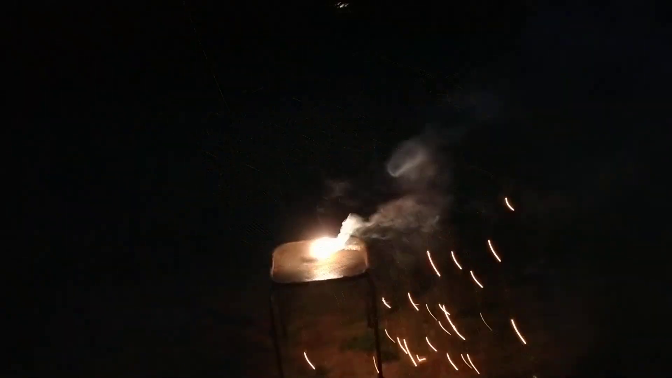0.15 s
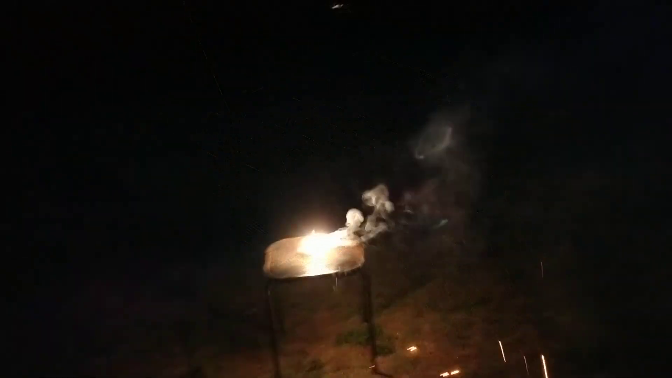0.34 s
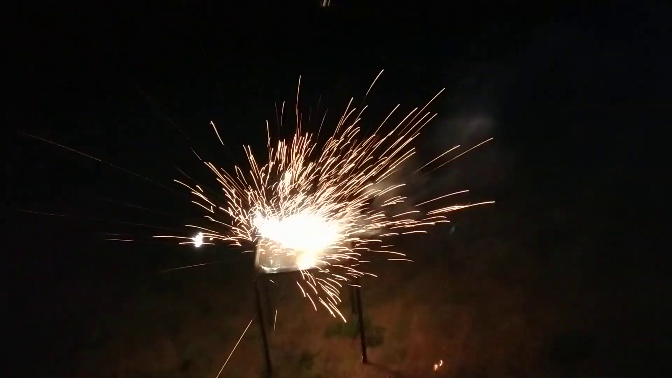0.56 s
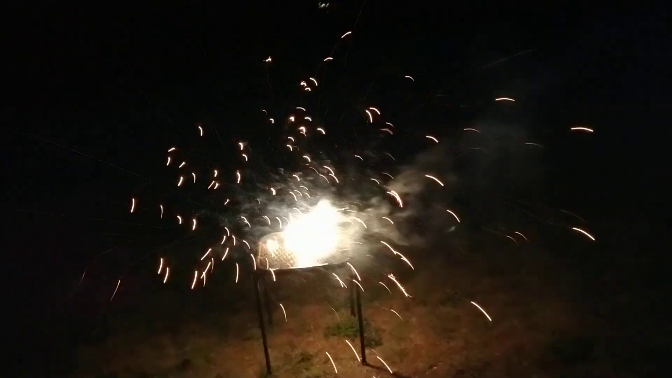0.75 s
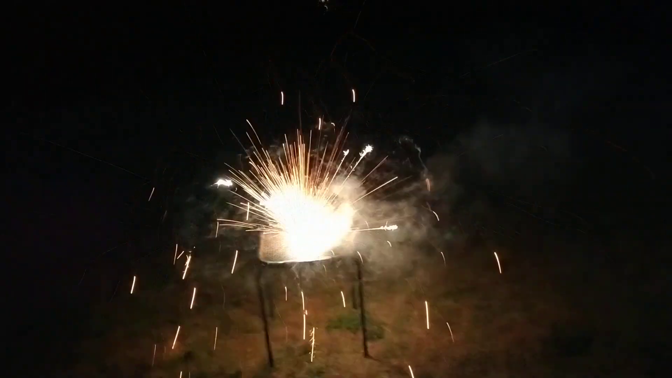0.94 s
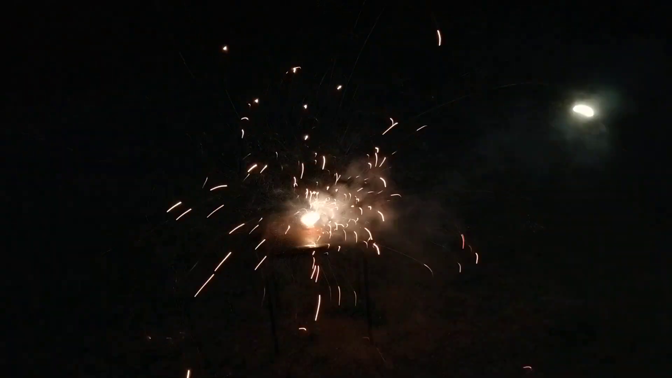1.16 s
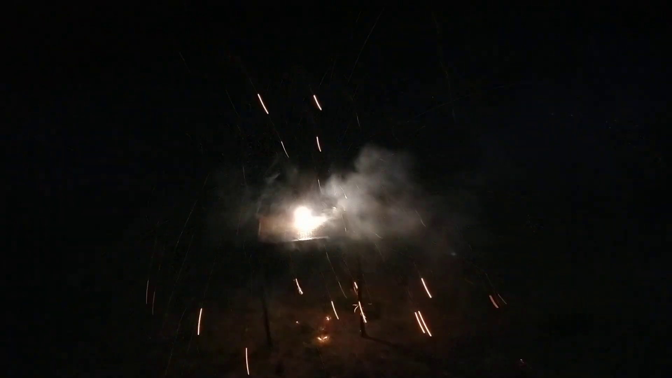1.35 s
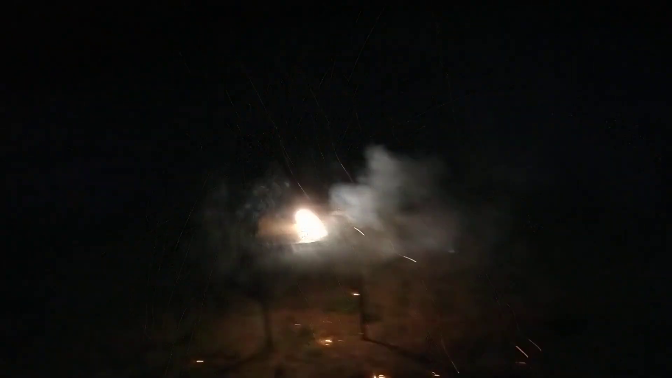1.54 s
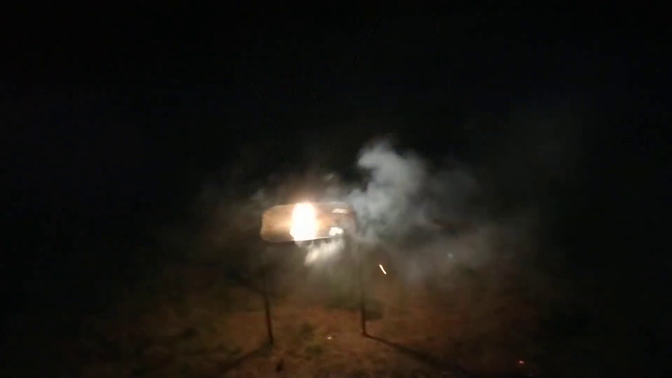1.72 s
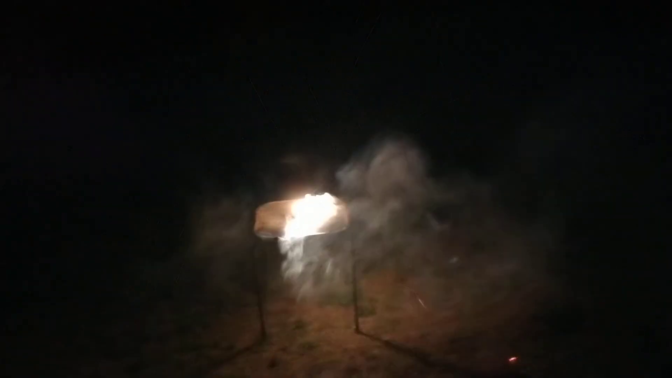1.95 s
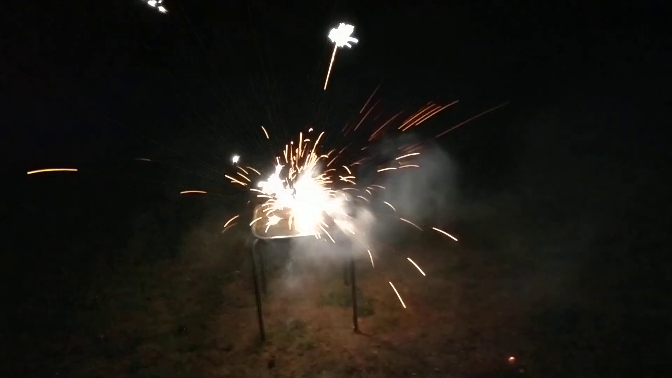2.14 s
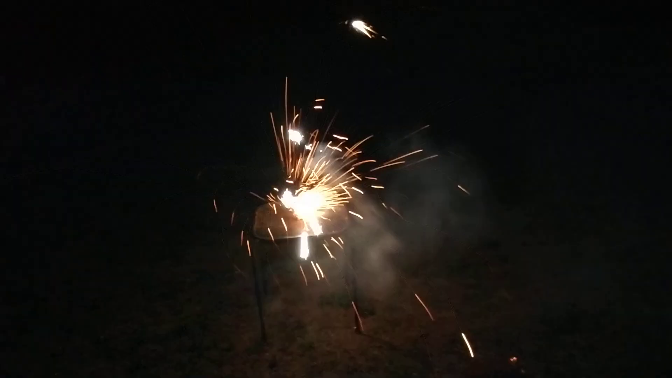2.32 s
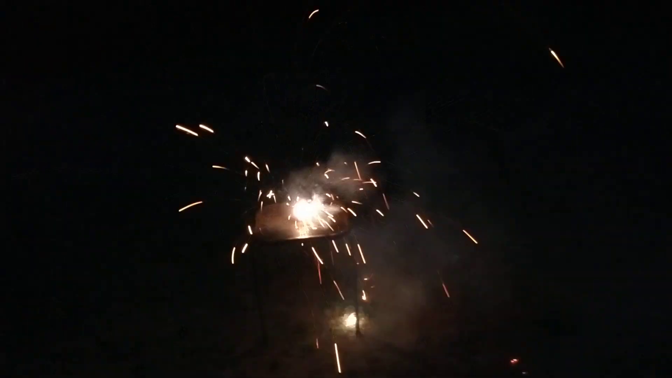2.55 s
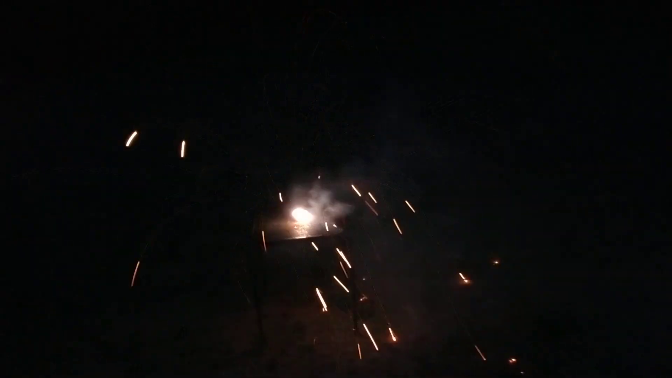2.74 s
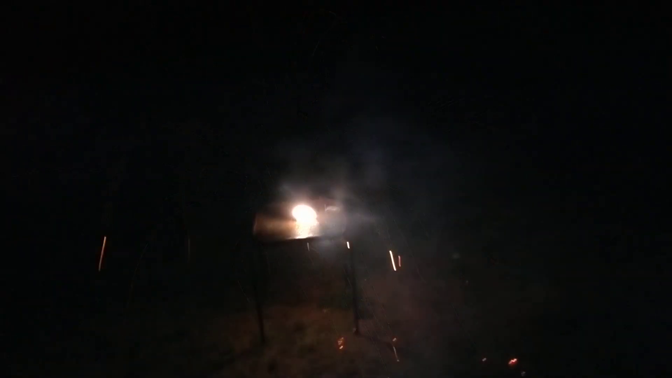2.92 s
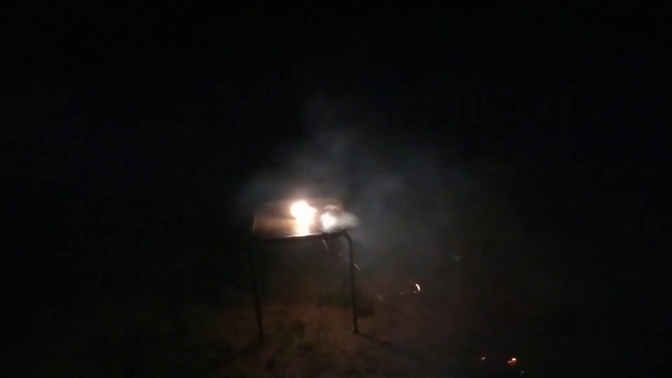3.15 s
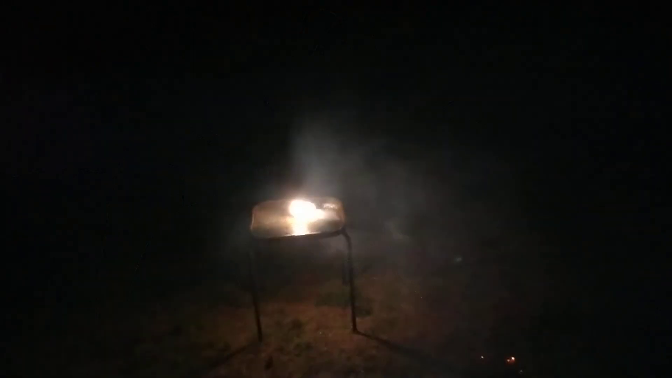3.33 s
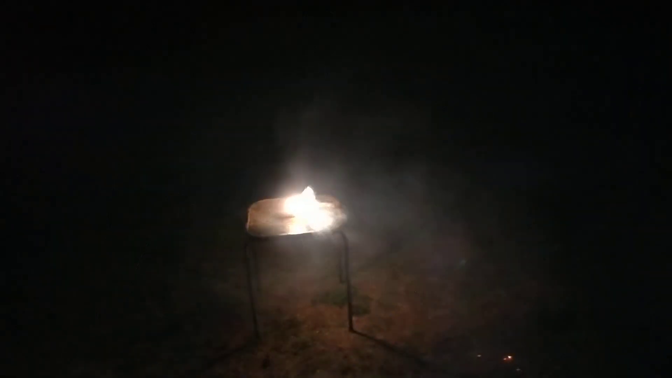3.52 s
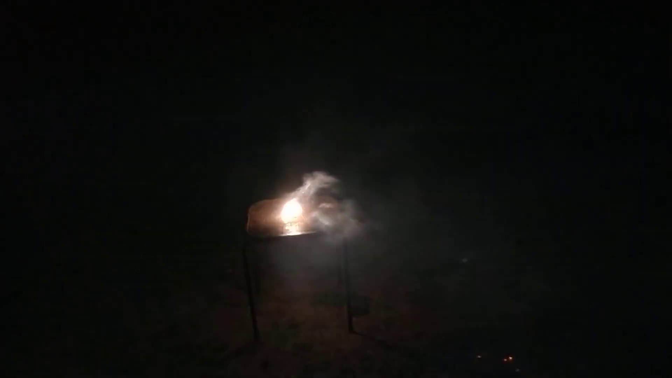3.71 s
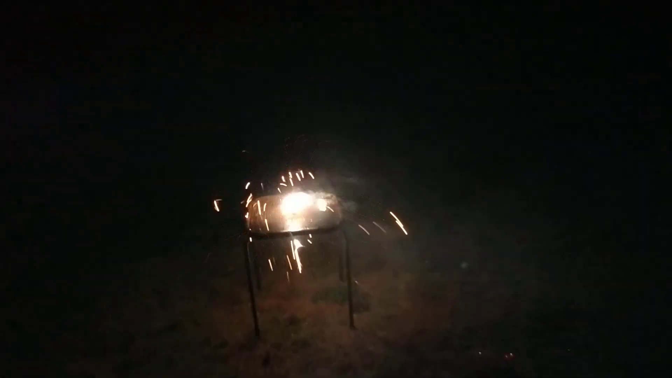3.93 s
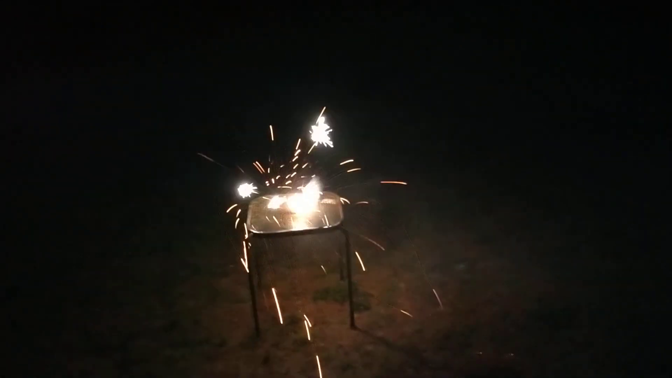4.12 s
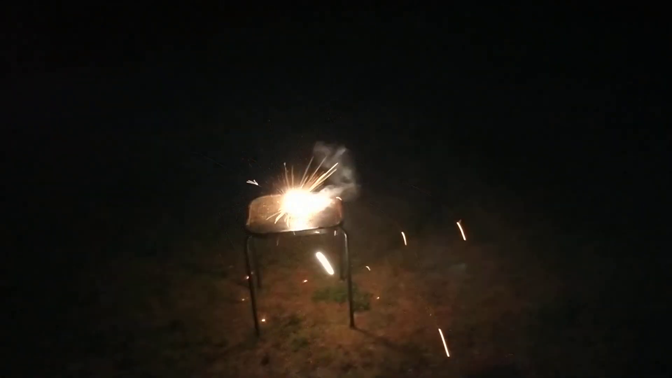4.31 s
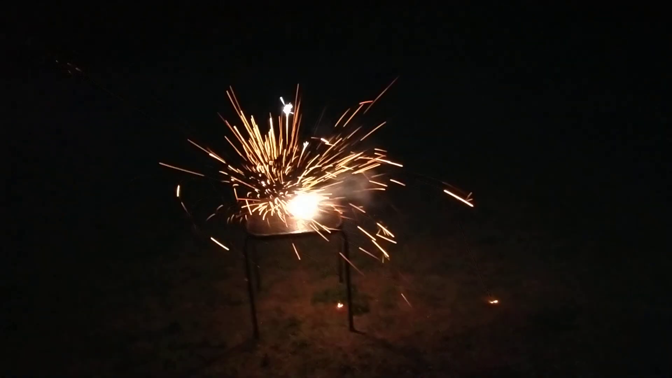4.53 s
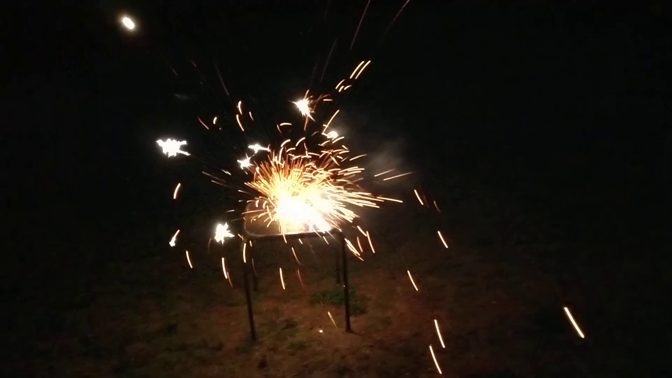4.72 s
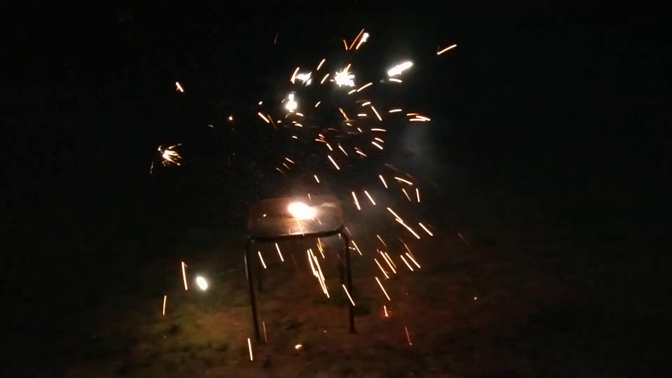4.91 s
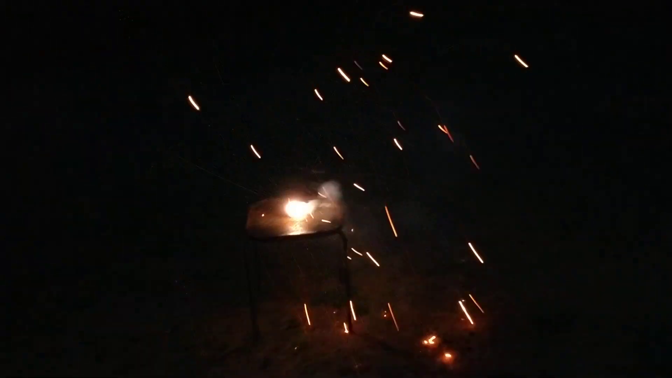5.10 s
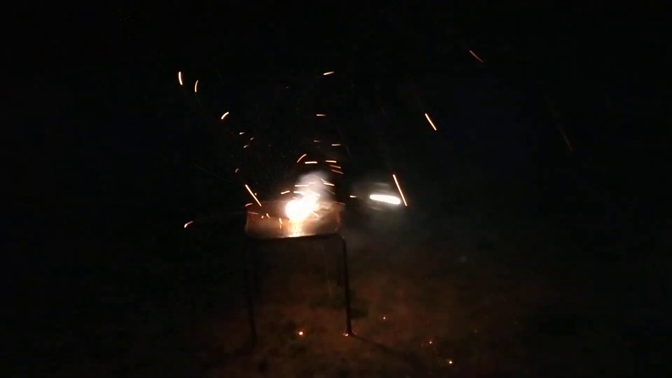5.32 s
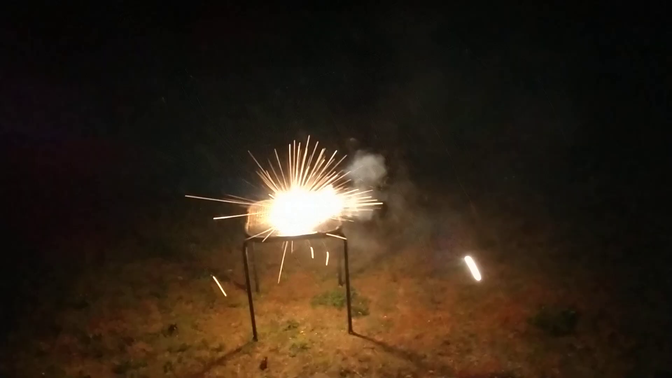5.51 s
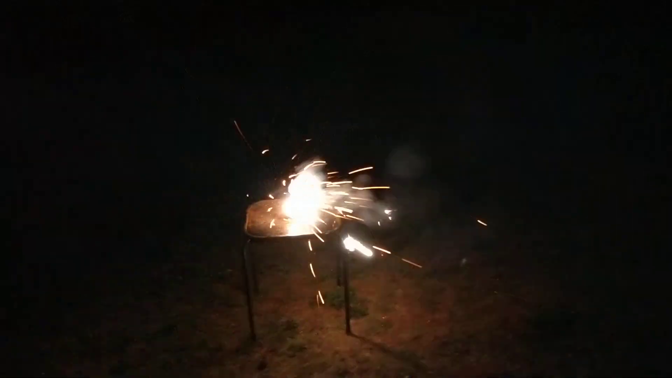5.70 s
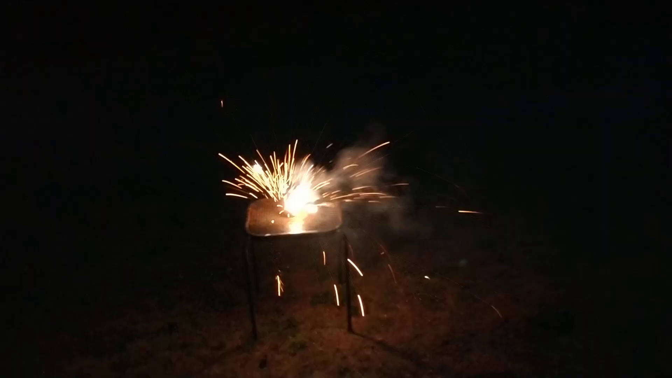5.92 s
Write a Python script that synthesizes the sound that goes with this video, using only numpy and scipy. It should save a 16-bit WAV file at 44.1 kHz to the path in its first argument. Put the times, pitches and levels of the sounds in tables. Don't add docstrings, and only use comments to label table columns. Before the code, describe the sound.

Night yard, stereo camera a few metres from a small firework on a table. It opens on the fading roll of an earlier bang, with bright fuse fizz, faint low traffic and a thin high insect trill. Around 0.4-0.55 s the fuse sputters in soft rapid puffs. A hard crack lands at 0.6, then a tight cluster at 1.0-1.2. Sizzle and small spits fill the gap until a double crack at 2.2, a very loud pair at 2.4 and another at 2.6. From 2.7 to 3.8 only fizz, flame rush, ticks and pattering cinders remain as echoes die. Cracks resume at 3.85-4.15, then crowd at 4.45-4.85, with more at 5.05, 5.3 and a close pair near 5.7. Each is an instant, clipped snap with a dull tabletop knock, quick slaps off ground and walls, and a diffuse roll; the last roll is still ringing at the end.

```python
import sys
import numpy as np
from scipy import signal
from scipy.fft import rfft, irfft, next_fast_len
from scipy.io import wavfile
from scipy.ndimage import uniform_filter1d, map_coordinates

SR = 44100
rng = np.random.default_rng(int(sys.argv[2]) if len(sys.argv) > 2 else 0)


def waveform_to_disk(signal):
    frames = np.transpose(np.atleast_2d(signal))
    scaled = np.clip(frames, -1, 1) * 32767
    samples = np.round(scaled).astype(np.int16)
    wavfile.write(sys.argv[1], SR, samples)


def invert_db(level):
    return 10 ** (np.asarray(level, dtype=float) / 20)


N = 262836


def unit(x):
    return x / np.sqrt(np.mean(x ** 2) + 1e-20)


def along(points, hz):
    f, v = np.transpose(points)
    return np.interp(np.log(hz + 1), np.log(f + 1), v)


def hump(centre_hz, steep_db):
    return lambda hz: -steep_db * np.log2((hz + 1) / centre_hz) ** 2


def filtered(x, response):
    m = next_fast_len(x.shape[-1] + 4096)
    return irfft(rfft(x, m) * response(np.fft.rfftfreq(m, 1 / SR)), m)[..., :x.shape[-1]]


# f/Hz, correlation/1
LIKENESS = [(60, 0.83), (180, 1), (550, 0.56), (1650, -0.046), (4970, -0.05), (15000, 0.11)]


def noise(size, colour_db):
    def response(hz):
        turn = np.arccos(np.clip(along(LIKENESS, hz), -1, 1)) / 2
        return invert_db(colour_db(hz)) * [np.cos(turn), np.sin(turn)]
    mid, side = filtered(rng.standard_normal((2, size)), response)
    return unit(np.array([mid + side, mid - side]))


def wobble(rate, size):
    knots = rng.standard_normal((2, int(size * rate / SR) + 4))
    return np.array([map_coordinates(k, [np.arange(size) * rate / SR], order=1) for k in knots])


def dying(t, t60, rise):
    t = np.maximum(t, 0)
    return (1 - np.exp(-t / rise)) * invert_db(-60 * t / t60)


def arrivals(table, t, scatter_db, rise):
    power = 0
    for s, left, right, t60 in table:
        level_db = np.c_[[left, right]] + scatter_db * rng.standard_normal((2, 1))
        power = power + (invert_db(level_db) * dying(t - s, t60, rise)) ** 2
    return np.sqrt(power)


def add(track, s, x):
    at = round(s * SR)
    track[:, max(at, 0):at + x.shape[1]] += x[:, max(-at, 0):]


# f/Hz, density/dB
TRAFFIC_COLOUR = [(25, -41), (45, -29.5), (64, -10), (86, -2), (130, -6.5), (180, -12), (230, -37),
                  (330, -54)]


def traffic():
    return invert_db(-64.5 + 1.6 * wobble(5.5, N)[0]) * noise(N, lambda hz: along(TRAFFIC_COLOUR, hz))


# t/s, f/Hz, level/dB
TRILL = [
    (0, 7680, -68),
    (0.599, 7580, -63.5),
    (1.502, 7840, -68),
    (2.15, 7800, -66.5),
    (2.9, 7850, -67),
    (3.3, 7790, -70),
    (3.83, 7690, -70.5),
    (6, 7740, -79),
]


def insect():
    s, trill_hz, db = np.transpose(TRILL)
    t = np.arange(N) / SR
    pitch_hz = np.interp(t, s, trill_hz) + 25 * wobble(30.0, N)[0]
    phase = 2 * np.pi * np.cumsum(pitch_hz) / SR
    return invert_db(np.interp(t, s, db) + 3.5 + 2.6 * wobble(50, N)) * np.cos(phase + 1.6 * wobble(160, N))


# t/s, sparks/dB, flame/dB
FUSE = [(0, 8.5, 2.5), (.27, 4, 4.5), (.31, 10.5, 5.5), (.43, 14.5, 10), (.6, 10, 5.5), (1.6, 0, 1.5),
        (1.71, 2, 5), (1.91, -11.5, -1), (2.15, -1, 0.5), (3.0, -12, -5), (3.1, -0.5, 1), (3.29, -7, -3),
        (3.51, -10, -3), (3.64, 5, -1.5), (3.74, -5, -2.5), (3.83, 2, -0.5), (4.3, 9, 3), (4.43, 6, -1.5)]
# f/Hz, density/dB
FIZZ_COLOUR = [(4000, -48), (7000, -8.5), (9000, -7), (10500, -1.5), (12000, -13), (13800, -2),
               (15600, -6.5), (16000, -25)]
# f/Hz, density/dB
FLAME_COLOUR = [(300, -52), (420, -11), (520, -7), (900, -10), (1900, -7.5), (3200, -20.5), (4500, -13.5),
                (7000, -27.5), (12000, -44)]


def fuse():
    fizz_db, flame_rush_db, flutter_db = -62.5, -59, -78
    s, *controls = np.transpose(FUSE)
    sparks_db, flame_db = (np.interp(np.arange(N) / SR, s, db) for db in controls)
    fizz = noise(N, lambda hz: along(FIZZ_COLOUR, hz))
    fizz = fizz * invert_db(fizz_db + sparks_db + 2.4 * wobble(47, N)[0])
    flame = noise(N, lambda hz: along(FLAME_COLOUR, hz))
    flame = flame * invert_db(flame_rush_db + flame_db + 0.67 * wobble(25, N)[0])
    flutter = noise(N, hump(270, steep_db=30))
    flutter = flutter * invert_db(flutter_db + 1.8 * flame_db + 2.6 * wobble(23, N)[0])
    return fizz + flame + flutter


# t/s, thud level/dB, thud f/Hz, tick level/dB
SPITS = [(.09, -53, 1730, -57.5), (.838, -53, 606, -51), (1.627, -50, 560, -58), (1.897, -51.5, 606, -70),
         (2.095, -57, 2060, -68), (2.849, -49, 585, -59), (3.016, -50.5, 970, -65), (3.034, -61, 1840, -72),
         (3.107, -61, 684, -72), (3.179, -68, 1980, -61), (3.259, -63.5, 593, -67),
         (3.405, -63.5, 1870, -79), (3.457, -64, 504, -53), (3.627, -66, 900, -60), (3.742, -66, 832, -58)]


def spits():
    out, t = np.zeros((2, N + SR)), np.arange(SR // 20) / SR
    for s, thud_db, thud_hz, tick_db in SPITS:
        thud = invert_db(thud_db) * dying(t, t60=0.036, rise=0.0004) * noise(len(t), hump(thud_hz, 10.5))
        tick = invert_db(tick_db) * dying(t, t60=0.028, rise=0.0006) * noise(len(t), hump(13000, 20))
        click = invert_db(thud_db - 7) * dying(t, t60=.008, rise=.0002) * noise(len(t), hump(3500, 4))
        add(out, s, invert_db(10.5) * (thud + click + tick))
    return out[:, :N]


# t/s, peak level/dB, bright part/dB
SPUTTER = [(0.408, -32, -5.5), (0.414, -47, -2), (0.423, -36, -2), (0.445, -33, -5), (0.453, -41, -4),
           (0.471, -29, -9), (0.482, -36, -11), (0.49, -37, -9), (0.498, -39, -7), (0.51, -32.5, -9),
           (0.523, -40, -9), (0.564, -35.5, -12)]
# f/Hz, density/dB
PUFF_COLOUR = [(70, -25), (170, -2), (372, 2), (600, -2), (1000, -2), (1600, -1), (1750, -22), (6000, -70)]


def sputter():
    out, t = np.zeros((2, N + SR)), np.arange(SR // 20) / SR
    for s, db, bright_db in SPUTTER:
        puff = dying(t, t60=0.036, rise=0.00046) * noise(len(t), lambda hz: along(PUFF_COLOUR, hz))
        grains = invert_db(3.7 * wobble(1500, len(t))[0])
        spray = grains * noise(len(t), lambda hz: -60. * (hz < 2800))
        spray = invert_db(bright_db + 5.5) * dying(t, t60=0.037, rise=0.0002) * spray
        add(out, s, invert_db(db - 3) * (puff + spray))
    return out[:, :N]


# peak level/dB, spot (0 middle, 1 side, 2 rim)
KNOCKS = [(-18.5, 1), (-12.5, 2), (-17.5, 2), (-18, 2), (-11.5, 1), (-9.5, 2), (-16.5, 1), (-9, 0),
          (-13.5, 0), (-13, 1), (-9, 0), (-16, 2), (-18, 1), (-24.5, 2), (-17.5, 1), (-8, 0), (-13.5, 1),
          (-22.5, 0), (-10, 2), (-22, 2), (-15, 1), (-10.5, 1), (-12, 2), (-16, 0)]
TOP_HZ = [560, 780, 1350]


def knocks():
    out, t = np.zeros((2, N + SR)), np.arange(SR // 20) / SR
    for (s, *_), (db, spot) in zip(BLASTS, KNOCKS):
        ring = noise(len(t), hump(TOP_HZ[round(spot)], steep_db=4.5))
        pan_db = -2.5 + 4 * rng.standard_normal()
        level = invert_db(db + pan_db * np.c_[[.5, -.5]])
        add(out, s, level * dying(t - .0005, t60=0.013, rise=0.00013) * ring)
    return out[:, :N]


# delay t/s, left level/dB, right level/dB, t60/s
FACADES = [
    (.062, -8, -10, 0.1),
    (.09, 2, -1.5, 0.21),
]
# f/Hz, density/dB
ROLL_COLOUR = [(35, -53.5), (60, -12), (100, -9.5), (217, -8.5), (380, -23.5), (450, -18), (900, -21),
               (1500, -16.5), (1800, -8.5), (2200, -7), (3000, -10.5), (5000, -6), (9350, -2.5),
               (16000, -4)]
# f/Hz, t60/s
YARD_T60 = [(100, 0.72), (400, 1.2), (1000, 2.45), (2000, 1.19), (4000, 0.93), (8000, 0.64), (15000, 0.4)]


def rolls():
    earlier = (-0.38, 0, -13)
    out, t = np.zeros((2, N + 2 * SR)), np.arange(SR * 3 // 4) / SR
    for s, *_, tilt, roll_db in [*BLASTS, earlier]:
        colour = lambda hz: along(ROLL_COLOUR, hz) + 0.77 * tilt * np.log2(np.maximum(hz, 1800) / 6000)
        hz, tau, z = signal.stft(noise(len(t), colour), SR, nperseg=256)
        decay = invert_db(-60 * tau / along(YARD_T60, hz)[:, None])
        tail = signal.istft(z * decay, SR, nperseg=256)[1][:, :len(t)]
        facades = arrivals(FACADES, t, scatter_db=-4.5, rise=0.0031)
        shape = np.hypot(1 - np.exp(-t / 0.024), facades) * np.sqrt(1 - t / t[-1])
        uneven_db = 1.2 * wobble(60, len(t)) + 2.65 * wobble(700, len(t)) + 0.48 * wobble(22.0, len(t))[0]
        add(out, s, invert_db(roll_db + uneven_db) * shape * tail)
    return out[:, :N]


# t/s, direct level/dB, echo level/dB, brightness/(dB per octave), yard roll level/dB
BLASTS = [(0.618, -10, -17, -1.5, -25.5), (0.997, -18.5, -14, 1.3, -27.5),
          (1.0403, -12.5, -14.5, -0.5, -25.5), (1.0584, -15, -15, 0, -25.5), (1.1894, -15, -9, -0.6, -17),
          (2.1711, -17, -13, 0.6, -20), (2.1921, -8.5, -12, -1.5, -22), (2.3903, -12, -8.5, 0, -25),
          (2.4019, -6.5, -9.5, 0.26, -15), (2.565, -11, -11, 2, -22), (3.8502, -16, -18.5, -0.5, -24.5),
          (3.8816, -15.5, -15, 5, -24.5), (3.953, -14, -15, 3, -23), (4.1455, -12, -19, 3, -29.5),
          (4.449, -17, -16.5, 1, -26), (4.5908, -6, -14, -2, -23), (4.691, -6, -13.5, -2.5, -24),
          (4.7688, -11.5, -8, -1.44, -25), (4.8231, -6, -8, 1.5, -20.5), (4.8511, -10.5, -17, -0.2, -18),
          (5.0527, -10.5, -13.5, 0, -22), (5.3185, -5.5, -8.5, -1, -17.5), (5.6609, -15, -14, -1.1, -24.5),
          (5.711, -9.5, -5, 3, -13)]
# f/Hz, density/dB
CRACK_COLOUR = [(100, -35), (250, -19.5), (500, -12.5), (1090, -15), (1550, -13), (2000, -4), (2520, -8.5),
                (5210, -6.5), (10500, -3.5), (16000, -7.5)]
# delay t/s, left level/dB, right level/dB, t60/s
WALLS = [
    (.0085, 16, 0, .006),
    (.0108, -5, 3, 0.013),
    (.0122, -10, 9, 0.013),
    (.0142, -16, 10, .012),
    (.021, -1.5, -8, 0.032),
]
# delay t/s, share/1
SHOCK_ECHOES = [
    (0, 1),
    (.0015, -0.5),
    (.0085, -.6),
    (0.0123, .5),
]


def cracks():
    bounce_s, shock_s = 0.0018, .00006
    out, t = np.zeros((2, N + SR)), np.arange(SR // 5) / SR
    near = t - np.c_[[0, .00015]]
    for s, direct_db, echo_db, tilt, _ in BLASTS:
        direct = invert_db(direct_db + 13) * dying(near, t60=.004, rise=.00003)
        ground = invert_db(echo_db + 7.5) * dying(near - bounce_s, t60=0.016, rise=.0001)
        scattered = dying(t, t60=0.15, rise=0.0019)
        walls = invert_db(echo_db) * np.hypot(arrivals(WALLS, t, scatter_db=2.5, rise=.0001), scattered)
        ragged = invert_db(2.2 * wobble(1800, len(t)) + 2.5 * wobble(7000, len(t)))
        colour = lambda hz: along(CRACK_COLOUR, hz) + tilt * np.log2(np.maximum(hz, 1800) / 6000)
        burst = noise(len(t), colour)
        burst[1] = unit(burst[1] + .5 * np.roll(burst[0], shift=7))
        envelope = np.sqrt(direct ** 2 + ground ** 2 + walls ** 2)
        add(out, s, envelope * unit(ragged * burst))
        u = np.maximum(near[:, :SR // 200], 0) / shock_s
        front = (u > 0) * (1 - u) * np.exp(-u)
        for late_s, share in SHOCK_ECHOES:
            level = invert_db(direct_db + 11.5 + 5.5 * rng.standard_normal((2, 1)))
            add(out, s + late_s, share * level * front)
    return out[:, :N]


# f/Hz, left over right/dB
CAPSULE_LEAN = [(60, 0), (240, 0.5), (950, -1.5), (3770, -2.5), (15000, 2)]


def scene():
    lean = lambda hz: invert_db(along(CAPSULE_LEAN, hz) * np.c_[[.5, -.5]])
    blasts = filtered(cracks() + rolls(), lean)
    return traffic() + insect() + fuse() + spits() + sputter() + knocks() + blasts


# left size/1, left late t/s, right size/1, right late t/s
SHOVES = [(0.55, -0.0001, 0.05, -0.0004), (0.07, 0.0004, 0.03, 0.0), (-0.15, 0.002, 0.23, 0.0006),
          (-0.2, -0.0001, -0.03, 0.0022), (0.44, -0.0001, -0.15, 0.001), (-0.04, 0.0017, 0.14, 0.0004),
          (0.08, 0.001, 0.36, 0.0003), (-0.12, 0.0013, -0.37, 0.0006), (-0.1, -0.0001, -0.07, 0.0005),
          (-0.15, 0.0012, -0.14, 0.0021), (0.56, -0.0002, 0.38, 0.0002), (-0.22, 0.0019, 0.21, 0.0006),
          (0.35, 0.0, 0.42, 0.0004), (0.08, -0.0004, 0.02, -0.0004), (0.14, 0.0005, 0.1, 0.0),
          (-0.41, 0.0008, -0.19, 0.001), (-0.45, 0.0014, -0.32, 0.0007), (0.19, -0.0002, -0.17, 0.0005),
          (-0.14, -0.0002, 0.12, 0.0014), (-0.14, 0.0004, 0.4, 0.0003), (0.51, 0.0, -0.66, 0.0005),
          (-0.27, -0.0002, -0.39, 0.0005), (0.53, -0.0001, 0.32, 0.0004), (-0.26, -0.0003, 0.03, 0.0007)]
LEAK_HZ = [
    [133],
    [185],
]


def shoves():
    swing_s, swing_back, soft_hz = .0016, 1.55, 1000
    cut_hz, width_hz = 100, 77
    steps = np.zeros((2, N))
    for (s, *_), (left, left_s, right, right_s) in zip(BLASTS, SHOVES):
        at = np.round((s + np.c_[[left_s, right_s]] + [0, swing_s]) * SR).astype(int)
        steps[[[0], [1]], at] = np.c_[[left, right]] * [1, -swing_back]

    def response(f):
        leak = SR / (2 * np.pi) / (LEAK_HZ + 1j * f) / (1 + (f / soft_hz) ** 2)
        return leak * (60j * f - f * f) / (cut_hz ** 2 - f * f + 1j * f * width_hz)
    return filtered(steps, response)


# f/Hz, gain/dB
BAND_LIMIT = [(5, -20), (25, 0), (15600, 0), (15800, -10), (16350, -14), (16500, -70)]


def band_limited(x):
    return filtered(x, lambda hz: invert_db(along(BAND_LIMIT, hz)))


# f/Hz, level/dB
FAINT = [(100, -100), (330, -86), (700, -102), (3300, -99), (6500, -100), (9000, -101), (15600, -102),
         (15750, -61)]


def gated(x):
    hz, _, z = signal.stft([x[0] + x[1], x[0] - x[1]], SR, nperseg=2048)
    edges = np.r_[0:64:4, 64:len(hz):10]
    band = np.searchsorted(edges, np.arange(len(hz)), side="right") - 1
    power = np.add.reduceat(abs(z) ** 2, edges, axis=1) / np.diff(edges, append=len(hz))[:, None]
    power = abs(uniform_filter1d(power, size=3, axis=2)) + 1e-20
    whim = unit(uniform_filter1d(rng.standard_normal(power.shape), size=7, axis=2))
    threshold = invert_db(along(FAINT, hz[edges])[:, None] + 1.9 * whim)
    keep = 1 / (1 + (4 * threshold ** 2 / power) ** 4)
    total, difference = signal.istft(z * keep[:, band], SR, nperseg=2048)[1][:, :N]
    return np.array([total + difference, total - difference]) / 2


def low_pass(x):
    return signal.sosfilt(signal.butter(12, 16470, fs=SR, output="sos"), x)


def record(dry):
    offset = np.clip(shoves(), -.9, .9)
    clipped = offset + np.clip(dry, abs(offset) - 1, 1 - abs(offset))
    mix = np.clip(gated(band_limited(clipped)), -1, 1)
    return low_pass(mix)


dry = scene()
out = record(dry)
waveform_to_disk(out)
```